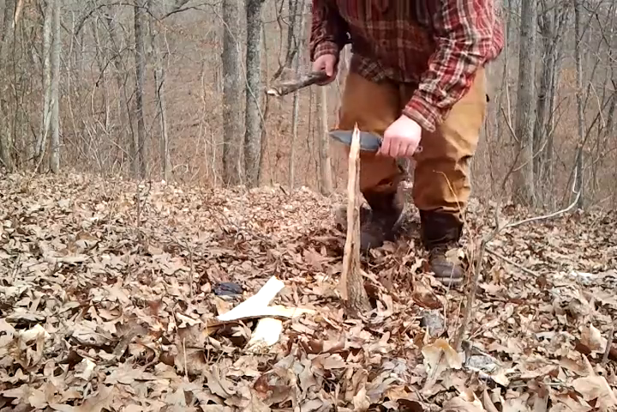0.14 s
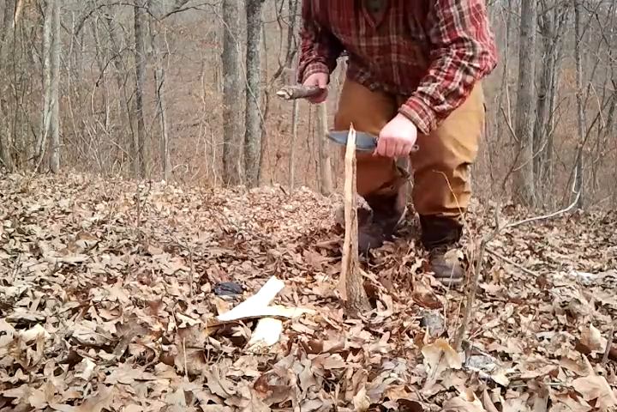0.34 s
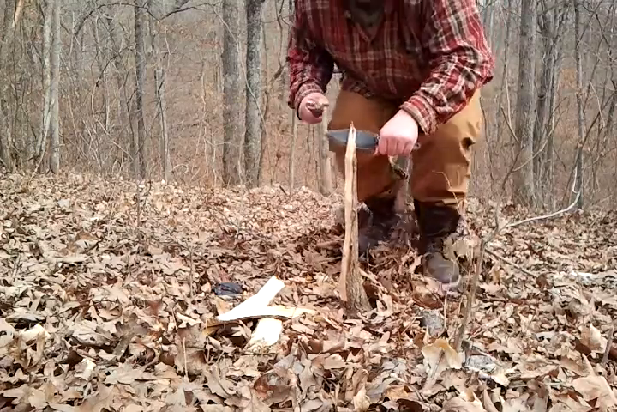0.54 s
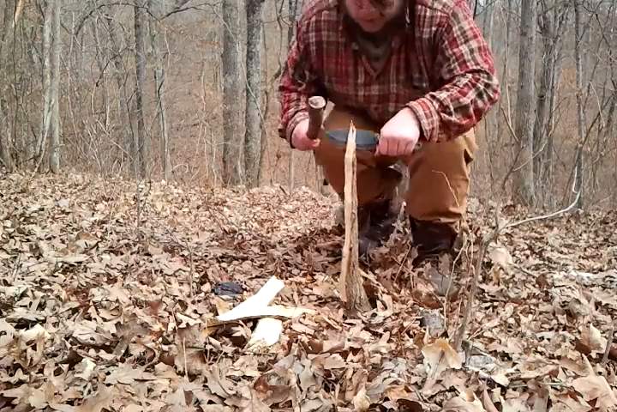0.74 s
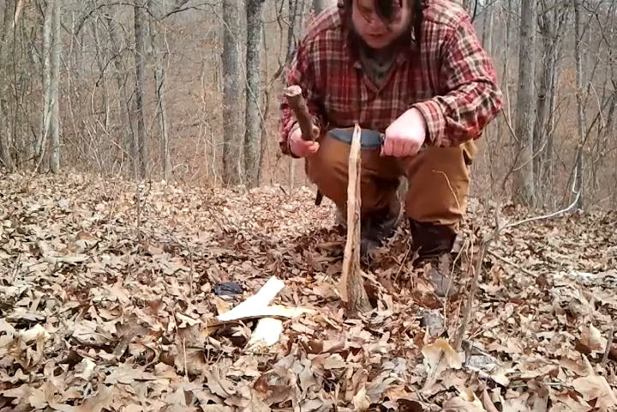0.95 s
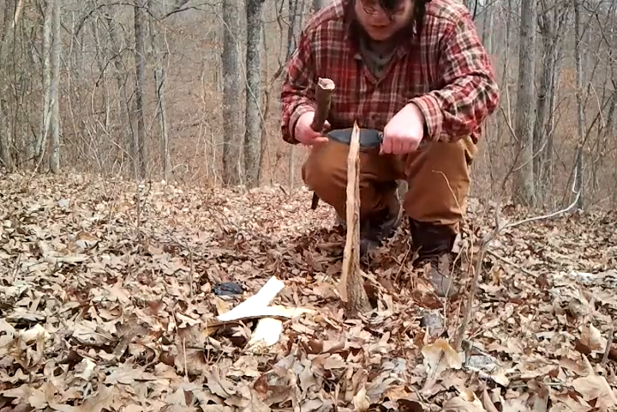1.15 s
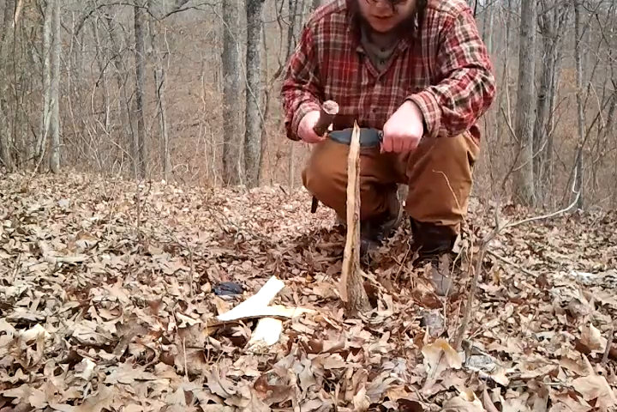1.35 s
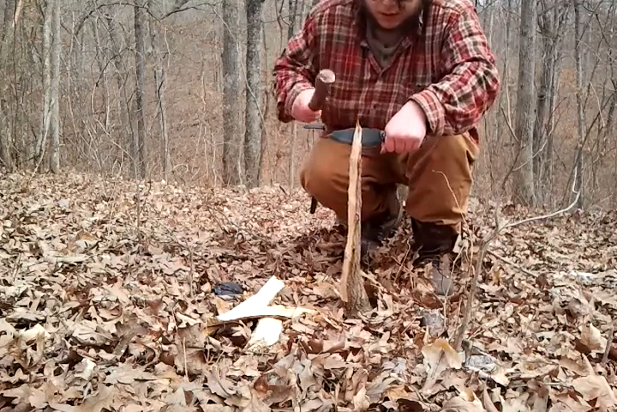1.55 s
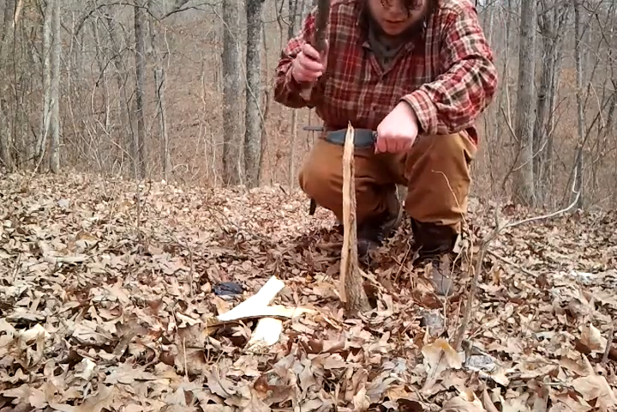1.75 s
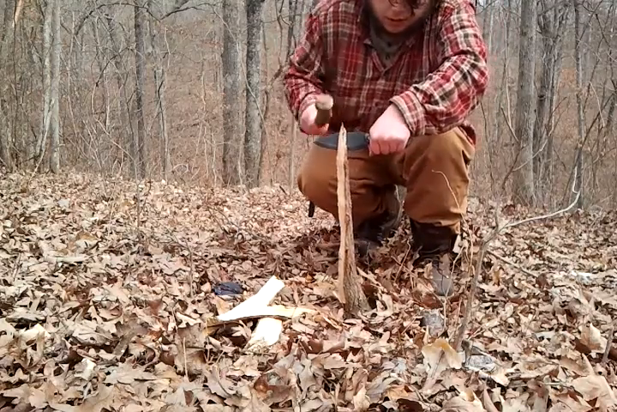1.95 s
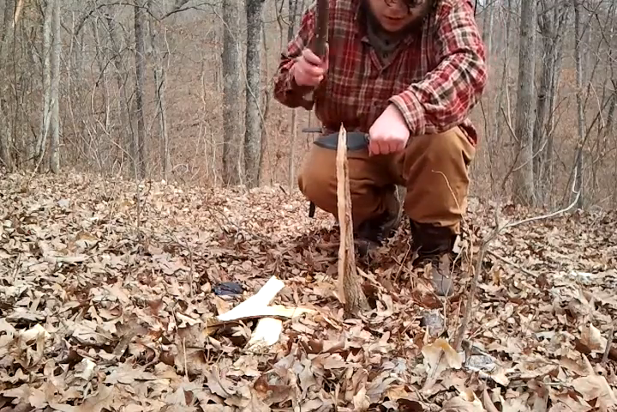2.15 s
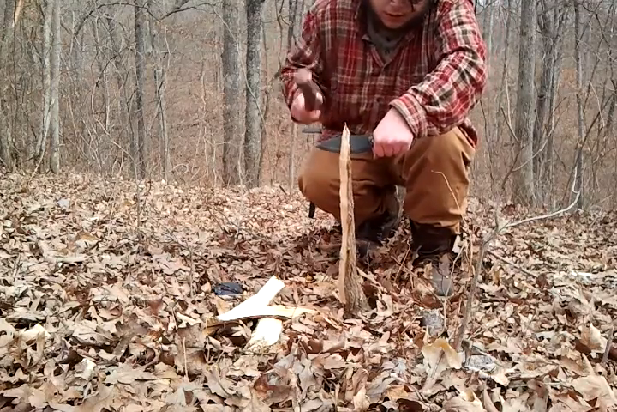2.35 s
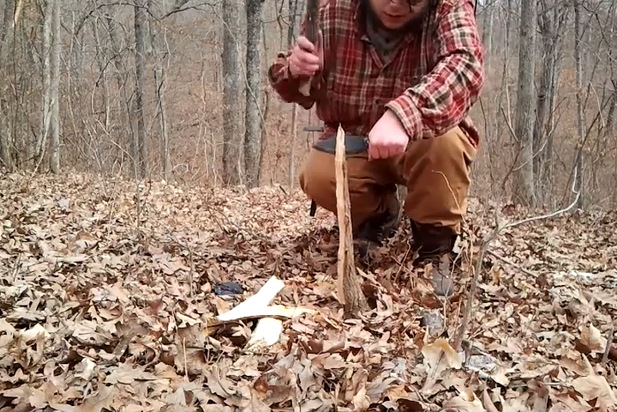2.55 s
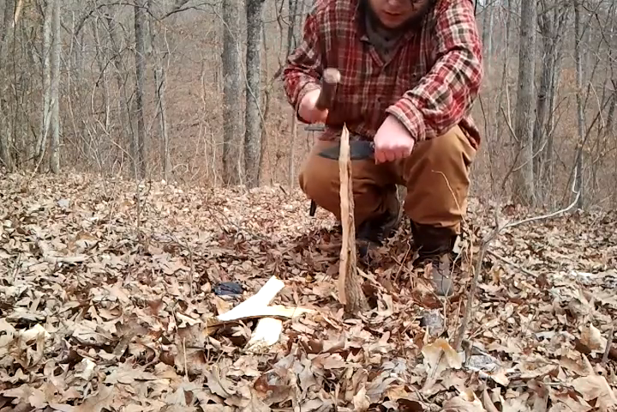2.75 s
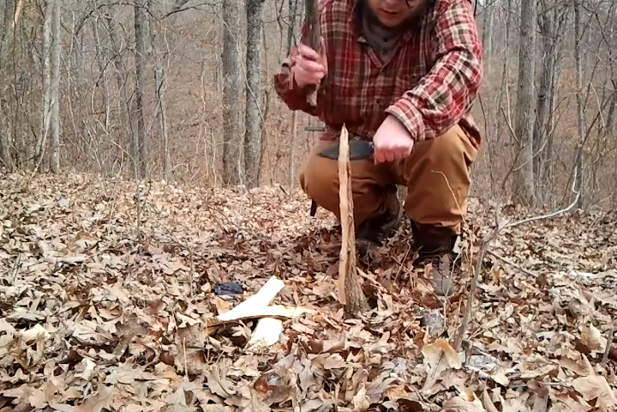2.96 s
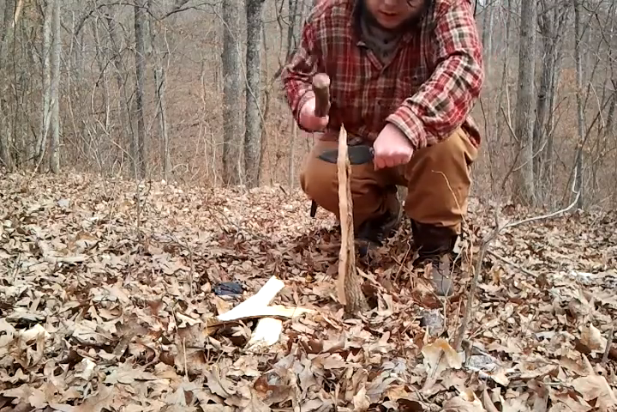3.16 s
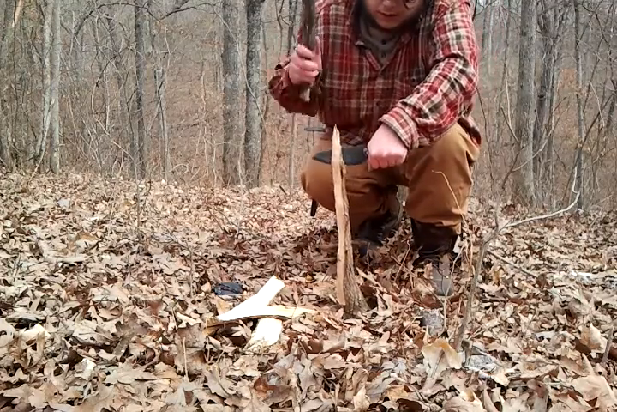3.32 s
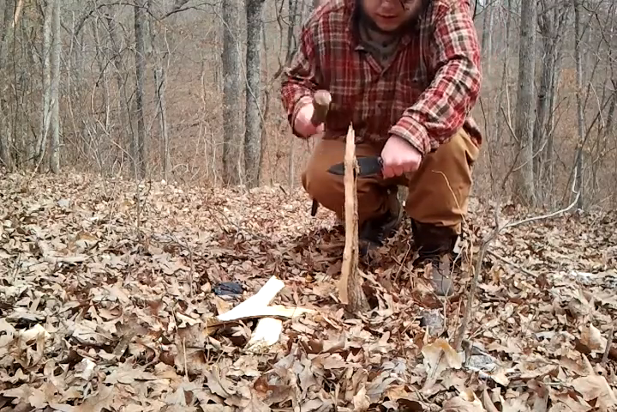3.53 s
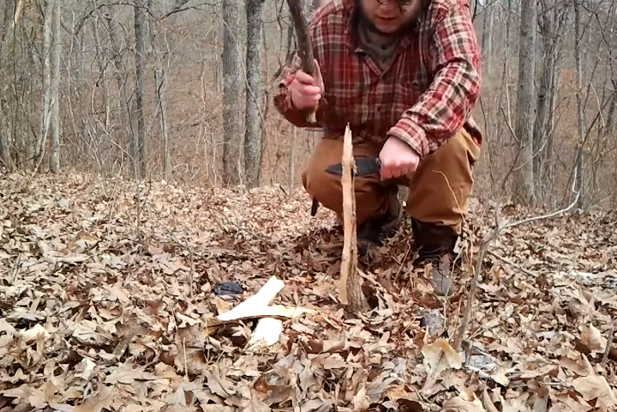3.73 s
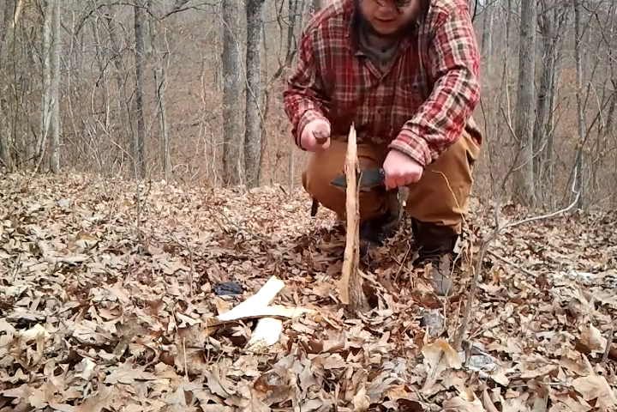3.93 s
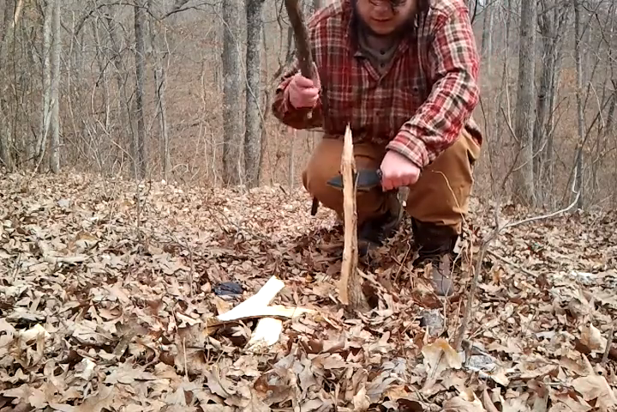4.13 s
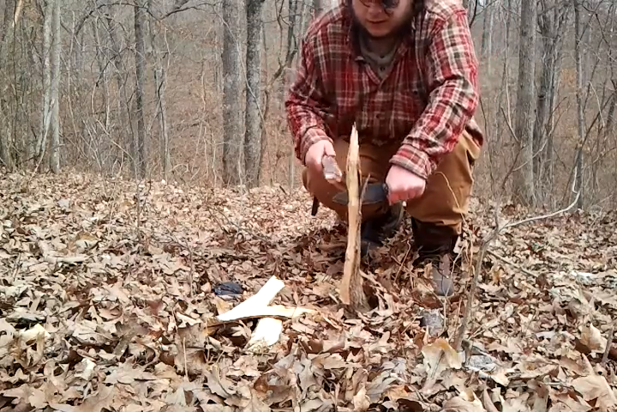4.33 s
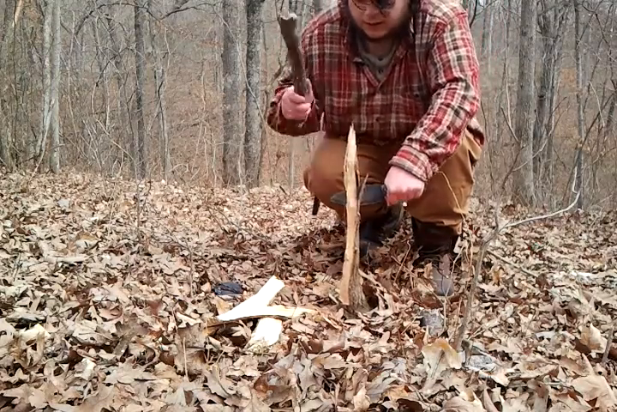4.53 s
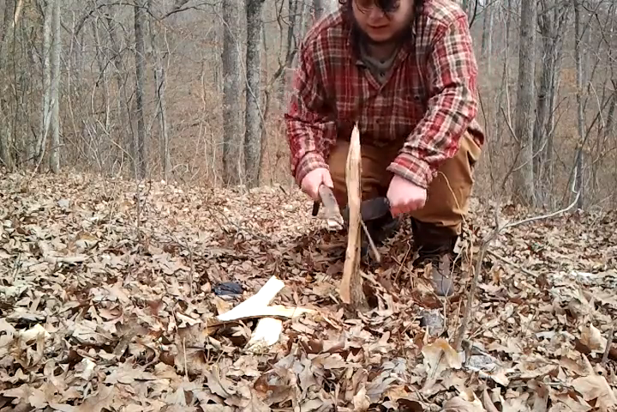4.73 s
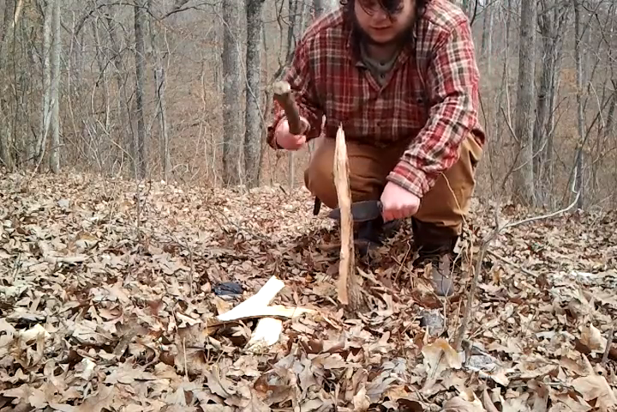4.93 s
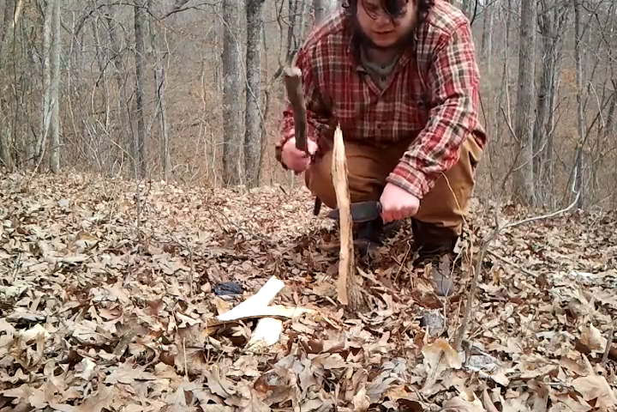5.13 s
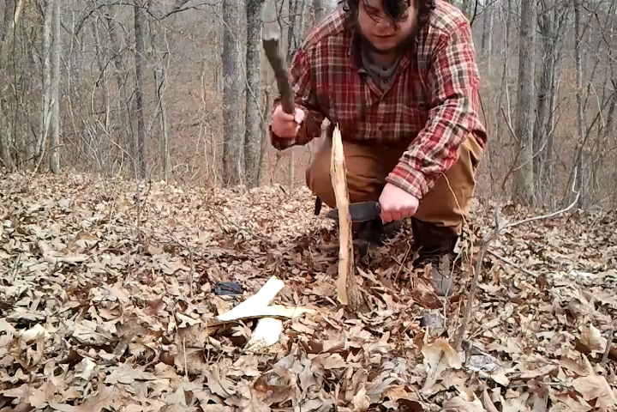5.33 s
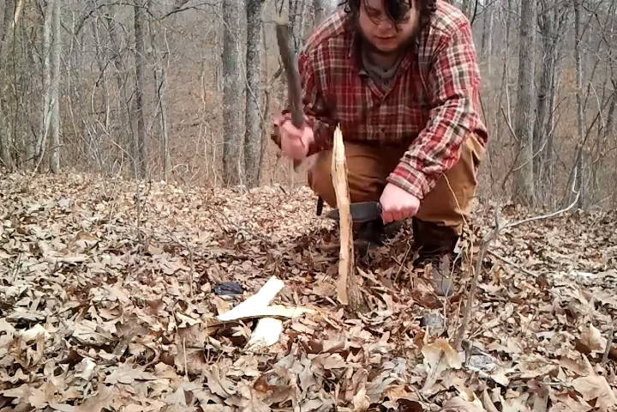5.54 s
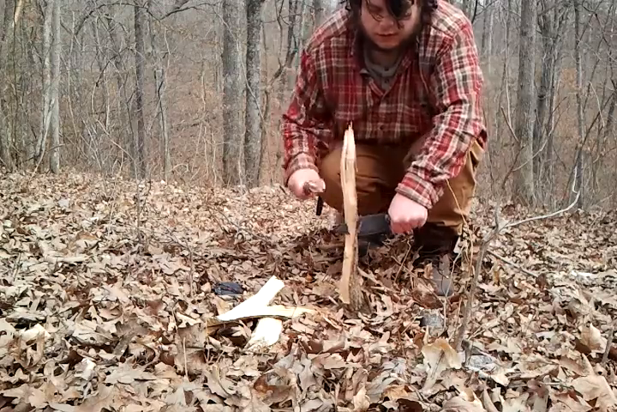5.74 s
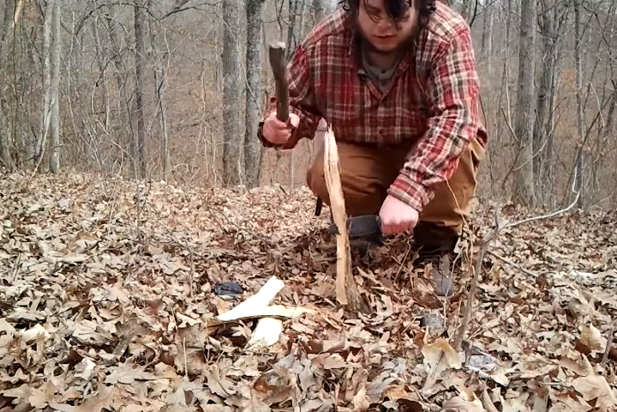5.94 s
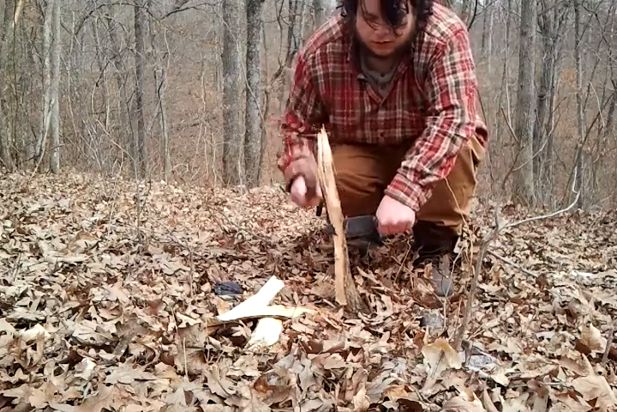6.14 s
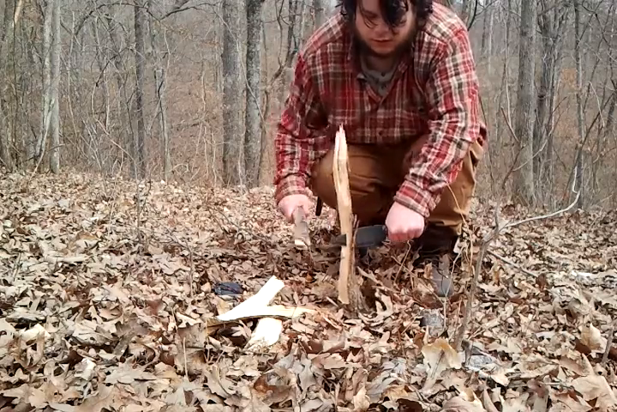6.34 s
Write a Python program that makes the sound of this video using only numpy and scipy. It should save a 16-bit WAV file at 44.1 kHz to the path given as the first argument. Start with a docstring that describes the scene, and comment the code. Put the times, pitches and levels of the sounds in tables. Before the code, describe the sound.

In a quiet leafless forest, feet shuffle and crush dry leaves for about a second and a half, with twig snaps and faint ticks. Then a wooden baton strikes a knife into a stick ten times: loud noisy cracks with a short choked ring, hollow knock and soft ground thump. Trees scatter each blow back. The close small microphone distorts on the hits.

```python
"""Ten blows of a wooden baton drive a knife down a standing stick, after someone steps and crouches in dry leaves.
Each blow is a noisy crack, a short ring of blade and stick, a hollow knock and a thump in the ground.
Bare trees throw the blows back as delayed and scattered copies; later on, torn fibres crackle.
Leaves are sprays of tiny noise grains, over still forest air and a faint low drone.
The small microphone rings near 5 kHz and overloads on every blow."""
import sys
import numpy as np
from scipy import signal
from scipy.io import wavfile

SR = 44100
rng = np.random.default_rng(int(sys.argv[2]) if len(sys.argv) > 2 else 0)


def to_wav(s):
    """Save 16-bit WAV."""
    ch = np.atleast_2d(s).T  # columns
    pcm = np.round(np.clip(ch, -1, 1) * 32767)  # PCM
    wavfile.write(sys.argv[1], SR, pcm.astype(np.int16))


N = 285768  # length in samples


def gain_of(db):
    """Turn decibels into a factor for the wave."""
    return 10 ** (np.asarray(db) / 20)


def evened(x):
    """Scale a sound to an average (RMS) level of 1."""
    return x / np.sqrt(np.mean(x ** 2) + 1e-20)


def read(points, hz):
    """Read a curve whose points are joined by straight lines over log frequency."""
    point_hz, value = np.transpose(points)
    return np.interp(np.log(hz + 1), np.log(point_hz + 1), value)


def add(mix, start_s, sound):
    """Mix a sound in at its start time, cut off at the end of the mix."""
    first = max(round(start_s * SR), 0)
    part = mix[first:][:len(sound)]
    part += sound[:len(part)]


def fade(t, t60):
    """Die away steadily, by 60 dB in t60 seconds."""
    return np.exp(-np.log(1000) * t / t60)


def colour(x, points, size=4096):
    """Filter to the given spectrum, responding as early as possible (minimum phase)."""
    hz = abs(np.fft.fftfreq(size, 1 / SR))
    log_gain = np.log(gain_of(read(points, hz)))
    taps = np.fft.ifft(np.exp(np.conj(signal.hilbert(log_gain)))).real
    return signal.oaconvolve(x, taps[:size // 2])[:len(x)]


def noise(points, count):
    """Make steady noise with the given spectrum, at RMS 1."""
    return evened(colour(rng.standard_normal(count), points))


def burst(points, t, t60, rise):
    """A dense cluster of tiny fractures: noise that builds up quickly and dies away."""
    return noise(points, len(t)) * fade(t, t60) * (1 - np.exp(-t / rise))


# Tone of the still air. Columns: pitch_hz, relative level_db
AIR = [(25, 2), (80, 11.5), (120, 10), (165, 7), (230, 4.5), (500, 2.5), (1000, 1.5), (2000, -5),
       (3500, -6.5), (5000, -10.5), (8000, -9.5)]
# Loudness of the far drone over time. Columns: time_s, level_db
DRONE = [(0, -86), (4, -74), (4.6, -64), (5.5, -62), (6.1, -70)]


def distance():
    """Still forest air as soft noise, and a low drone, a narrow band of noise, that comes and goes."""
    air = gain_of(-55.0) * noise(AIR, N)
    drone = noise([(20, -64.0), (140, -17.5), (165, 2), (190, -33.0), (500, -47.5)], N)
    drone_db = np.interp(np.arange(N) / SR, *np.transpose(DRONE))
    return air + gain_of(drone_db) * drone


# Feet push into the leaves. Columns: peak_s, level_db, swell_s
PUSHES = [(.11, -26, 0.47), (0.257, -22, 0.12), (.70, -32, 0.058), (.838, -26, 0.12), (1.02, -37.5, 0.031),
          (1.59, -48, 0.026)]
RELEASE_T60, SETTLE_DB, SETTLE_T60 = 0.15, -18, 2.7  # a push stops quickly (s); leaves settle on (dB, s)


def stirring():
    """Level of the leaves in dB: each push of a foot swells, stops, and leaves them settling."""
    t, power = np.arange(N) / SR, np.zeros(N)
    for peak_s, level_db, swell_s in PUSHES:
        before, after = np.maximum(peak_s - t, 0), np.maximum(t - peak_s, 0)
        release = fade(after, RELEASE_T60) + gain_of(SETTLE_DB) * fade(after, SETTLE_T60)
        power += (gain_of(level_db) * np.exp(-before / swell_s) * release) ** 2
    return 10 * np.log10(power + 1e-12)


# Tone of crackling leaves. Columns: pitch_hz, relative level_db
LEAVES = [(60, -20.5), (200, -7.5), (450, -4.5), (650, -4), (900, -5.5), (1500, -6.5), (2300, -0.5),
          (2900, -0.5), (3800, 0.5), (5000, 4.5), (8000, 0.5)]


def crackle(per_s, spread_db):
    """Leaf grains of very uneven size, each a couple of milliseconds long."""
    grain_size = gain_of(spread_db * np.minimum(rng.exponential(1, N), 4))
    grain_size *= rng.random(N) < per_s / SR  # grains start at random moments
    power = signal.lfilter([1], [1, -np.exp(-1 / (.0009 * SR))], grain_size ** 2)
    return evened(colour(np.sqrt(power) * rng.standard_normal(N), LEAVES))


TICKS_DB, RESTLESS_TICKS_DB = -61.5, -64  # steady ticking, and more while the body is still shifting
STILL_S, CALMING_S = 1.54, 0.021  # when and how quickly the crouch comes to rest


def leaves():
    """Shuffling feet crush leaves, which also tick faintly under a crouched body."""
    level_db = stirring()
    crush = np.clip((level_db + 43) / 16, 0, 1)  # a hard push breaks many leaves at once
    dense = crackle(2200, 2.8)
    sparse = crackle(550, 3.4)
    ticking = crackle(60, 4.6)
    grains = np.sqrt(crush) * dense + np.sqrt(1 - crush) * sparse
    restless = 1 / (1 + np.exp((np.arange(N) / SR - STILL_S) / CALMING_S))
    ticks_gain = gain_of(TICKS_DB) + gain_of(RESTLESS_TICKS_DB) * restless
    return gain_of(level_db) * grains + ticks_gain * ticking


# How fast the early scatter from the trees dies. Columns: pitch_hz, t60_s (time to fall 60 dB)
FOREST_DECAY = [(100, 0.37), (500, 0.94), (1600, 0.78), (2600, 0.73), (5000, 0.44), (8000, 0.36)]
# Tone of sound thrown back by the trees. Columns: pitch_hz, gain_db
TREES = [(60, 1.5), (250, -8), (600, -17), (1000, -4), (1350, -10), (1650, 2), (2050, -4.5), (2550, 1),
         (3000, -3.5), (4000, -8.5), (5300, -1.5), (8000, -5)]


def forest(x, db=-15.5, first=.029, late_db=-27, late_t60=1.4):
    """Scatter from many trees farther off; bass and treble die sooner than the middle, over a weak long tail."""
    arrivals = rng.standard_normal(SR) * (rng.random(SR) < .12)
    hz, t, bands = signal.stft(arrivals, SR, nperseg=256)
    decay = fade(t, read(FOREST_DECAY, hz)[:, None]) + gain_of(late_db) * fade(t, late_t60)
    tail = signal.istft(bands * decay, SR, nperseg=256)[1]
    response = np.zeros(SR)
    add(response, first, gain_of(db) * tail / np.linalg.norm(tail))
    return signal.oaconvolve(x, colour(response, TREES))[:N]


# Feet and knees press the ground. Columns: start_s, level_db
STEPS = [(0.225, -39.5), (0.83, -35.5), (1.22, -50), (1.292, -46.5)]


def steps():
    """The weight of feet and knees makes dull, low bursts in the ground."""
    t, out = np.arange(SR // 4) / SR, np.zeros(N)
    tone = [(30, -12), (90, -8), (180, -10), (400, -20.5), (2000, -48)]
    for start_s, level_db in STEPS:
        add(out, start_s, gain_of(level_db) * burst(tone, t, 0.2, rise=0.0028))
    return out


# The loudest snaps of dry leaves and twigs. Columns: start_s, level_db, treble_db (of the tone at 7500 Hz)
SNAPS = [(0.519, -31.5, -14), (0.542, -31, -8), (0.5952, -20, -8), (0.961, -27.5, -9), (0.984, -28, -11),
         (1.129, -32, -8), (1.2454, -39, -5), (1.296, -39, 2), (1.34, -35, 12), (1.3935, -31.5, -8),
         (1.453, -40, -3), (1.499, -38.5, -17), (1.5531, -32, 9), (1.634, -36.5, -6), (1.729, -41.5, 0),
         (2.6875, -35, -19), (2.798, -37.5, -10), (3.2237, -38, -4), (3.9881, -28.5, -17),
         (5.7348, -33.5, -7)]
SNAP_T60 = 0.021  # seconds


def snaps():
    """Dry leaves and twigs break with very short bursts, some much brighter than others."""
    t, out = np.arange(SR // 4) / SR, np.zeros(N)
    for start_s, level_db, treble_db in SNAPS:
        tone = [(60, -17.5), (1500, -11), (3000, -12), (4500, -2), (7500, treble_db), (12000, -6.5)]
        add(out, start_s, gain_of(level_db) * burst(tone, t, SNAP_T60, rise=0.00039))
    return out


def ring(modes, t, hz):
    """Damped tones set off together, at multiples of one pitch."""
    out = np.zeros(len(t))
    for multiple, level_db, t60 in modes:
        out += gain_of(level_db) * fade(t, t60) * np.sin(2 * np.pi * multiple * hz * t)
    return out


def thump(t, hz=77, t60=0.2, rise=.005):
    """The soft forest floor takes a push: one low, fading tone."""
    return np.sin(2 * np.pi * hz * t) * fade(t, t60) * (1 - np.exp(-t / rise))


# The baton blows. Columns: start_s, crack_db, crack_t60_s, ring_db, main_ring_hz, knock_db, knock_hz
BLOWS = [(2.0999, -3, 0.045, -10.5, 1370, -19, 514), (2.4822, 0.5, 0.029, -9.5, 1475, -19.5, 595),
         (2.8703, 2, 0.03, -8.5, 1513, -13.5, 490), (3.2650, 0.5, 0.03, -5.5, 1541, -11, 463),
         (3.6561, 6.5, 0.025, -11, 1572, -13.5, 487), (4.0621, 3, 0.03, 0, 1561, -12, 519.5),
         (4.493, -1.5, 0.04, 0.5, 1564, -22, 537), (4.939, 3.5, 0.026, 2, 1560, -19, 488),
         (5.8471, -5.5, 0.043, -6, 1604, -12, 528), (6.415, -7, 0.041, -8, 1582, -11.5, 530)]
# Tone of a crack. Columns: pitch_hz, relative level_db
CRACK = [(60, -24.5), (190, -11.5), (320, -11.5), (800, -0.5), (1200, 0), (1500, 3), (2000, 1), (2600, 0),
         (3400, 0.5), (4600, 2), (6500, -1), (9000, -8.5)]
# What blade and stick ring with, before the choking. Columns: multiple of the main ring, level_db, t60_s
RING = [(.58, -2.5, .025), (1, 3, .045), (1.635, -1, 0.04), (2.09, -9.5, 0.035), (3.02, -12, 0.067),
        (3.24, -13, 0.067), (4.26, -10.5, 0.041)]
# Hollow knock of the baton. Columns: multiple of the knock pitch, level_db, t60_s
KNOCK = [(.62, -9, 0.043), (1, 1, 0.036)]
# The baton grazes the stick or rattles on the blade around a blow. Columns: start_s, level_db, t60_s
GRAZES = [(3.667, -15, 0.017), (4.0745, -7, 0.011), (4.4877, -6, 0.018), (4.9331, -5, 0.01),
          (5.839, -7, 0.026), (6.407, -13.5, 0.033), (6.4248, -10.5, 0.02)]
GRAZE_ONSET = 0.1  # share of its decay time that a graze takes to build up
# The split opens ever faster and passes less to the ground (dB, dB per blow squared)
THUMP_DB, THUMP_LOSS_DB = -32, .29
# Harder blows carry farther (dB per dB); each lands lower and carries less (dB per blow)
ECHO_DB, ECHO_FOLLOWS, ECHO_LOSS_DB = -3, 0.49, 0.16


def baton(sent_db=19, sent_ring_db=-16, grip=0.0078, contact=0.025):
    """The blows as heard close by, and the snap and ring of each that travel out among the trees."""
    t, near, far = np.arange(SR // 4) / SR, np.zeros(N), np.zeros(N)
    snap = colour(signal.unit_impulse(len(t)), CRACK)
    snap *= gain_of(sent_db) / np.linalg.norm(snap)
    push = 1 - np.exp(-t / 0.0013)  # the soft baton takes a moment to pass on its push
    pinch = np.exp(-(t / grip) ** 2)  # the split closes on the blade and chokes its ring
    rebound = np.exp(-(t / contact) ** 2)  # the crack ends as the baton rebounds
    for blows_before, blow in enumerate(BLOWS):
        start_s, crack_db, crack_t60, ring_db, ring_hz, knock_db, knock_hz = blow
        thump_db = THUMP_DB - THUMP_LOSS_DB * blows_before ** 2
        echo_db = ECHO_DB + ECHO_FOLLOWS * crack_db - ECHO_LOSS_DB * blows_before
        blade = ring(RING, t, ring_hz) * pinch
        knock = ring(KNOCK, t, knock_hz)
        wood = push * (gain_of(ring_db) * blade + gain_of(knock_db) * knock)
        crack = gain_of(crack_db) * burst(CRACK, t, crack_t60, rise=0.0012) * rebound
        add(near, start_s, crack + wood + gain_of(thump_db) * thump(t))
        add(far, start_s, gain_of(echo_db) * (snap + gain_of(sent_ring_db) * blade))
    for start_s, level_db, t60 in GRAZES:
        add(near, start_s, gain_of(level_db) * burst(CRACK, t, t60, rise=GRAZE_ONSET * t60))
    return near, far


def ground(x, db=-17, t60=0.26):
    """Leaf litter and undergrowth close by scatter sound back at once."""
    tone = [(60, 1), (500, -3.5), (1200, -4), (2500, 0.5), (5400, -3.0), (8000, -3.5)]
    scatter = burst(tone, np.arange(SR // 4) / SR, t60, rise=0.005)
    return gain_of(db) * signal.oaconvolve(x, scatter / np.linalg.norm(scatter))[:N]


# Echoes from the nearest trunks. Columns: delay_s, level_db
ECHOES = [(0.0107, -27.5), (0.0306, -24), (.0335, -43), (.047, -38)]


def trunks(x):
    """Single echoes from the nearest trees: delayed, quieter copies in the trees' tone."""
    out = np.zeros(N)
    for delay_s, level_db in ECHOES:
        add(out, delay_s, gain_of(level_db) * x)
    return colour(out, TREES)


def zing(hz=5180, delay=.0162, length=0.0069, db=-25.5, follows=0.34):
    """A brief, narrow ping of treble follows each blow, stronger after a louder crack."""
    t, out = np.arange(SR // 50) / SR, np.zeros(N)
    swell = np.sin(np.pi * np.minimum(t / length, 1)) ** 2
    ping = swell * np.sin(2 * np.pi * hz * t)
    for start_s, crack_db, *_ in BLOWS:
        add(out, start_s + delay, gain_of(db + follows * crack_db) * ping)
    return out


# Fibres tear as the split runs on. Columns: middle_s, level_db, length_s
TEARS = [(5.067, -39, 0.062), (6.022, -35, 0.02)]
# Tone of tearing fibres against a leaf grain. Columns: pitch_hz, gain_db
FIBRES = [(100, 4), (2000, 2), (5000, 0), (8000, 3)]


def splitting():
    """After a deep blow the split runs on: a short spell of tearing fibres, as dense crackle."""
    t, spells = np.arange(N) / SR, np.zeros(N)
    for middle_s, level_db, length_s in TEARS:
        spells += gain_of(level_db) * np.exp(-(2 * (t - middle_s) / length_s) ** 4)
    return spells * evened(colour(crackle(1436, 2.8), FIBRES))


def scene():
    """Blows and leaves, their echoes, and the quiet of the woods."""
    quiet = distance()
    rustle = leaves() + steps() + snaps() + splitting()
    near, far = baton()
    ping = zing()
    into_forest = far + gain_of(5.5) * rustle + gain_of(-0.5) * ping
    echoes = ping + trunks(near) + ground(far) + forest(into_forest)
    return (near + echoes + rustle + quiet)[None]


# How strongly the microphone picks up each pitch. Columns: pitch_hz, gain_db
MICROPHONE = [(20, -8.5), (70, -4.5), (3500, 1.5), (4300, 4), (4850, 10), (5200, 11), (5650, 6),
              (6300, -0.5), (7500, 2), (8200, -6.5), (8800, -22.5), (9300, -51), (11000, -71.5)]
EDGE_HZ = 16000  # upper band limit


def record(dry, release_db_per_s=7000, overshoot_db=1.5):
    """The microphone's resonance and narrow band, a very fast limiter, clipped tips, then the band limit."""
    x = colour(dry[0], MICROPHONE)
    ceiling = .73  # full scale is 1
    threshold = ceiling * gain_of(overshoot_db)
    over_db = 20 * np.log10(np.maximum(abs(x) / threshold, 1))
    fall = np.arange(N) / SR * release_db_per_s  # it grips at once and lets go within a few cycles
    reduction_db = np.maximum.accumulate(over_db + fall) - fall
    limited = np.clip(x / gain_of(reduction_db), -ceiling, ceiling)
    band_limit = signal.firwin(255, EDGE_HZ, window=("kaiser", 9), fs=SR)
    return signal.oaconvolve(limited, band_limit, "same")[None]


dry = scene()
out = record(dry)
to_wav(out)
```